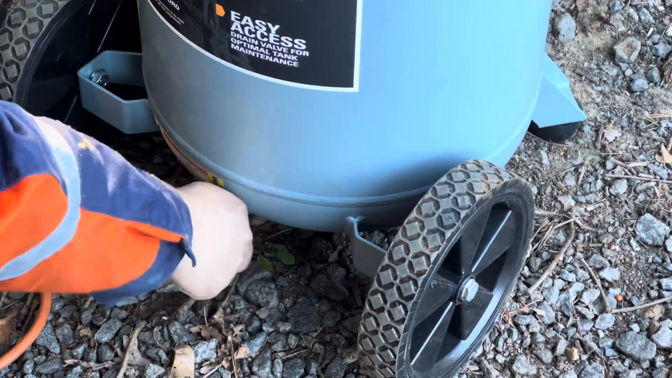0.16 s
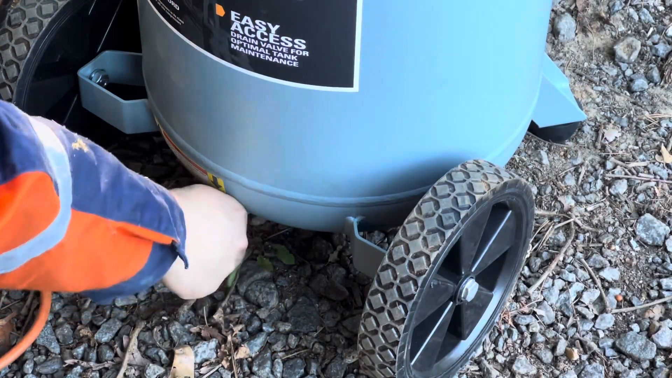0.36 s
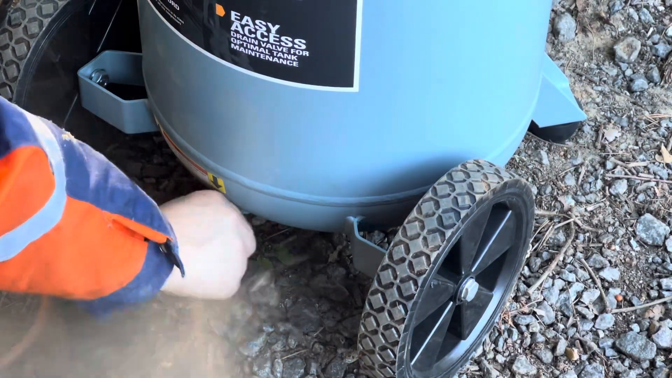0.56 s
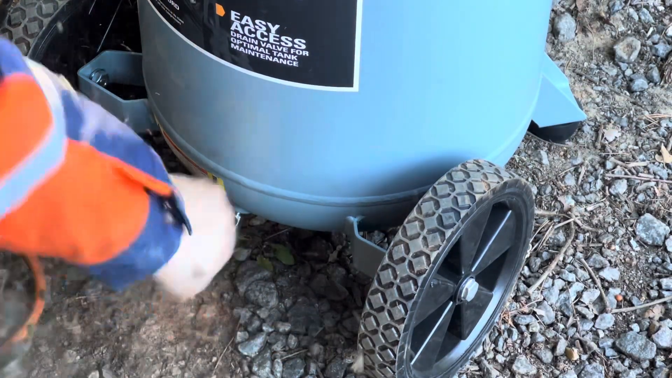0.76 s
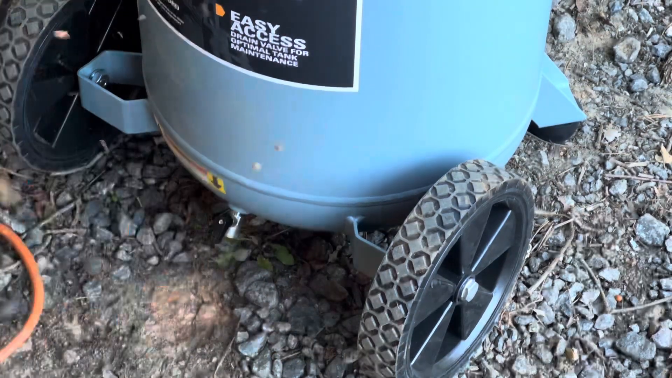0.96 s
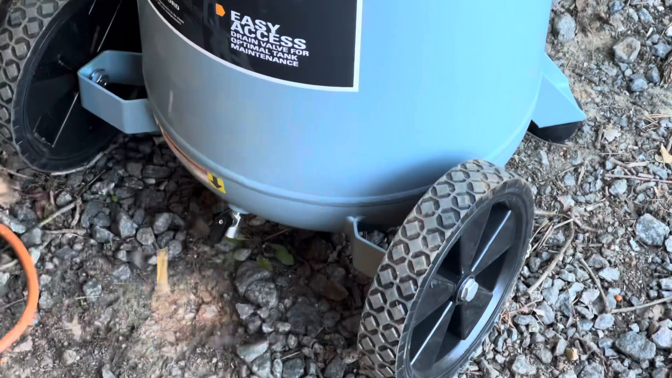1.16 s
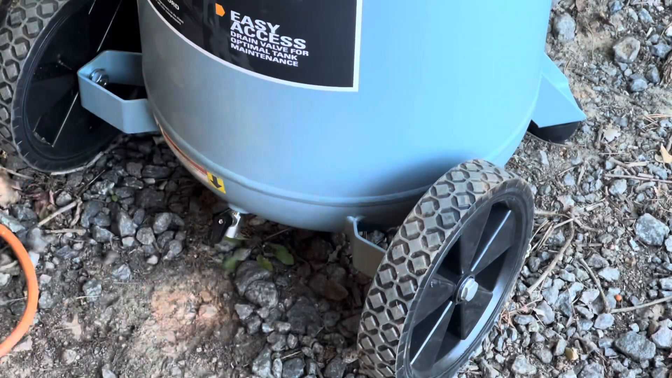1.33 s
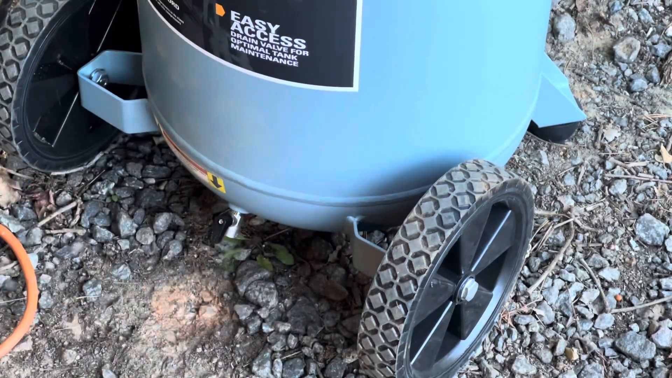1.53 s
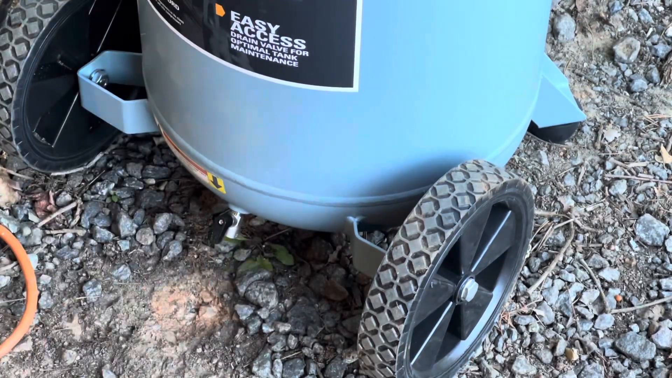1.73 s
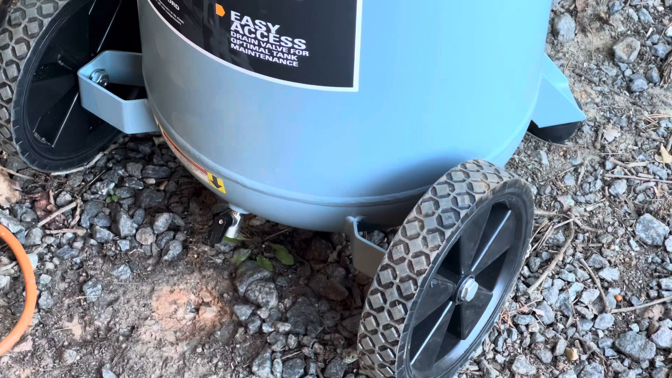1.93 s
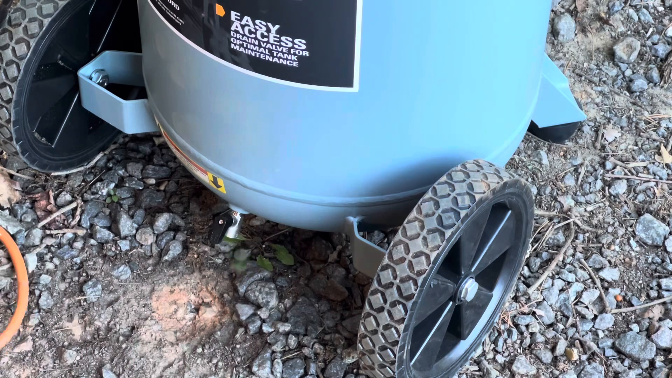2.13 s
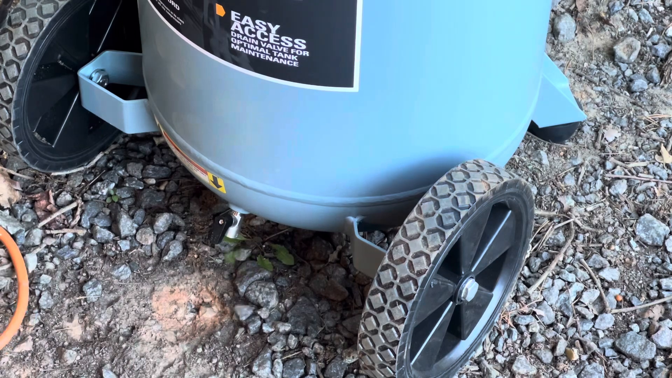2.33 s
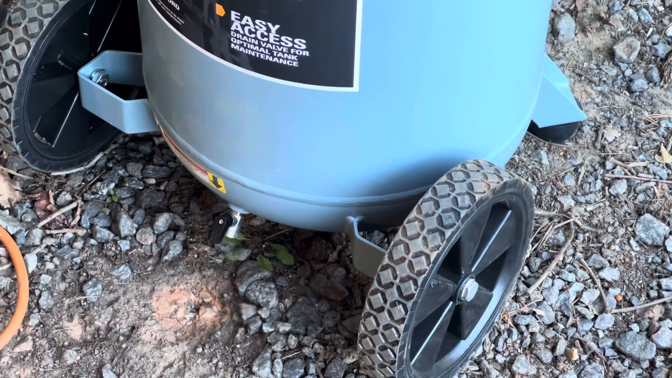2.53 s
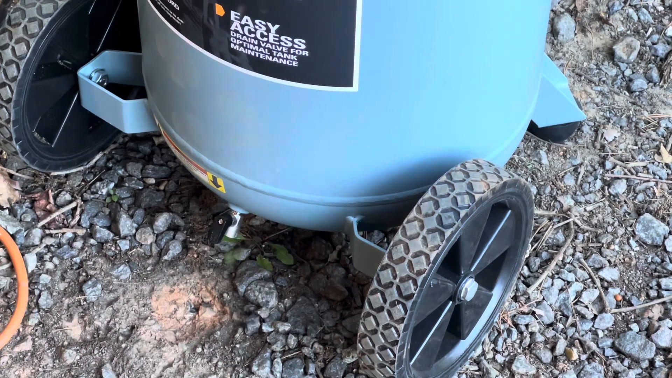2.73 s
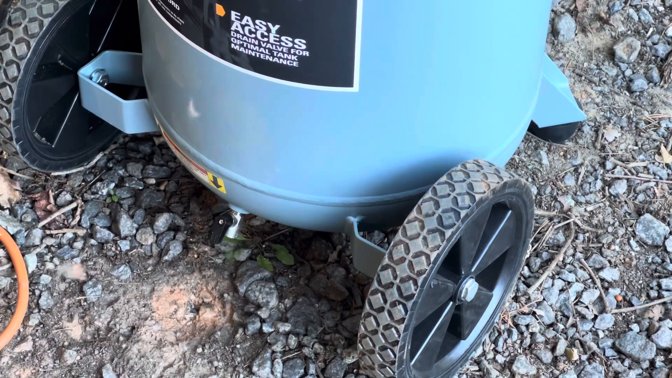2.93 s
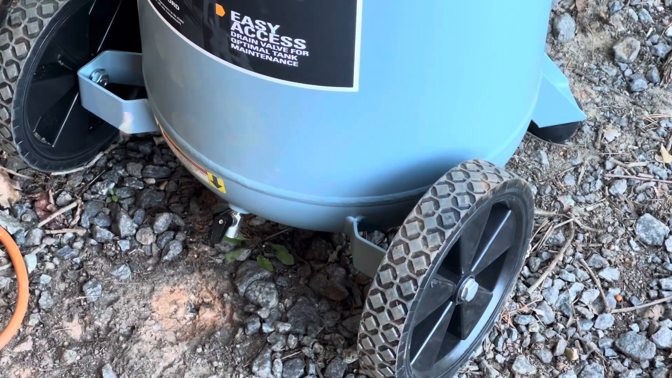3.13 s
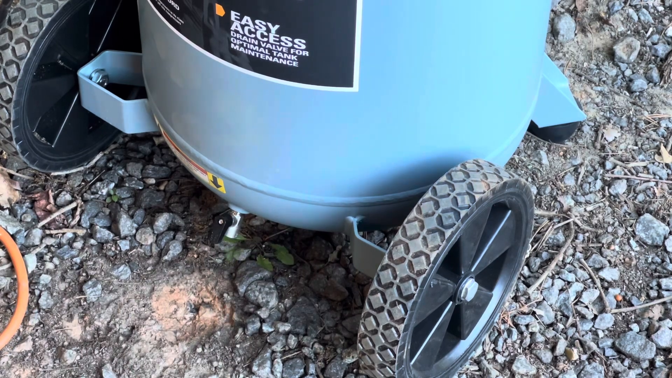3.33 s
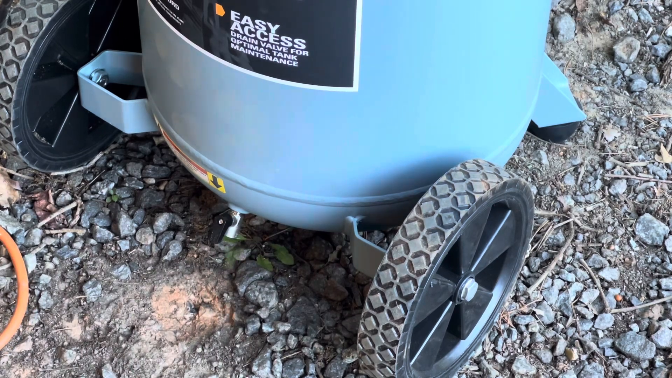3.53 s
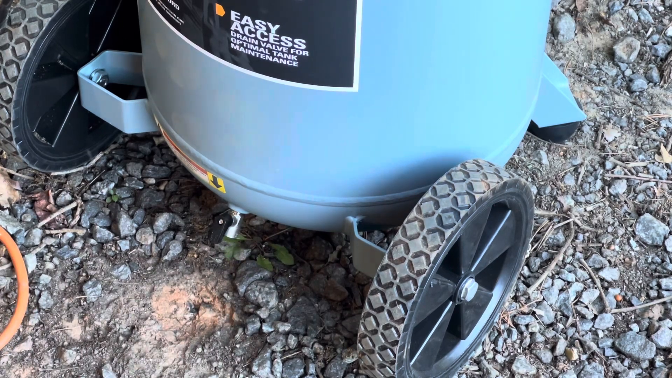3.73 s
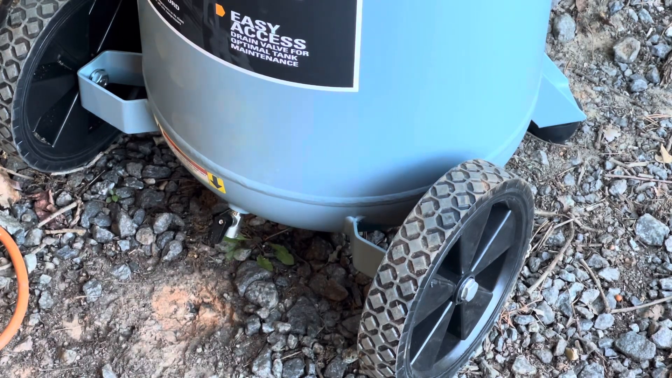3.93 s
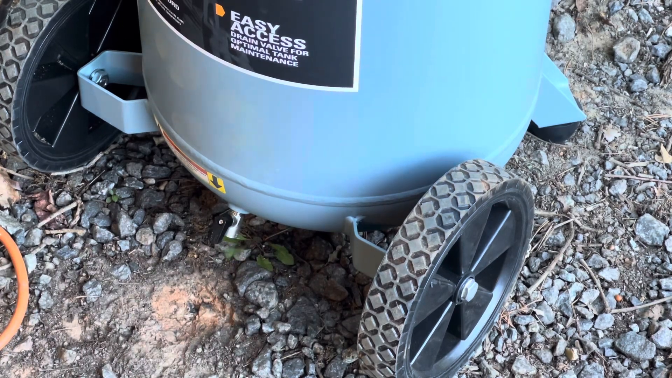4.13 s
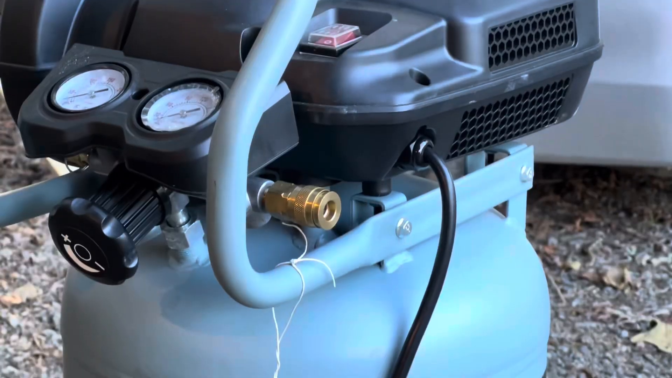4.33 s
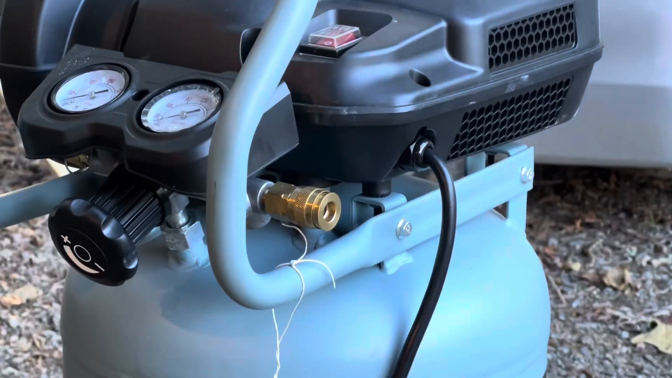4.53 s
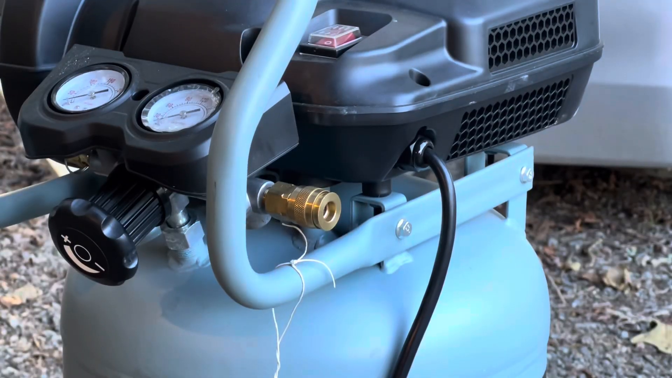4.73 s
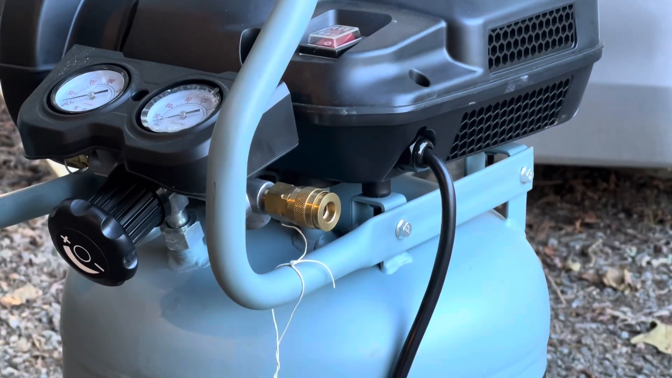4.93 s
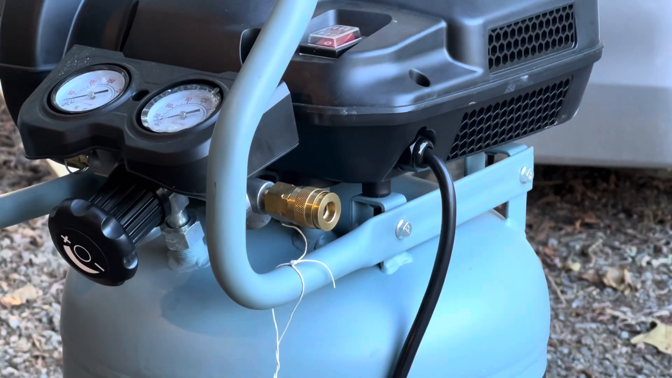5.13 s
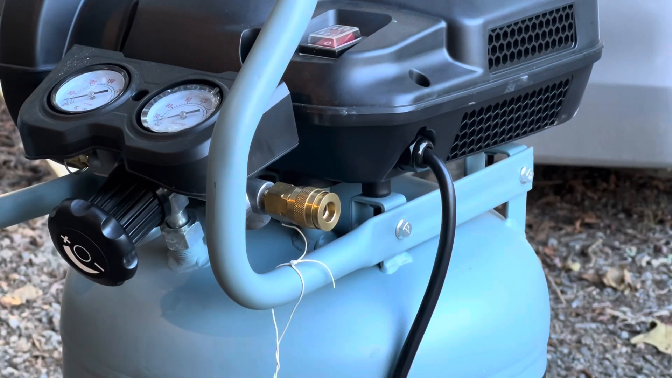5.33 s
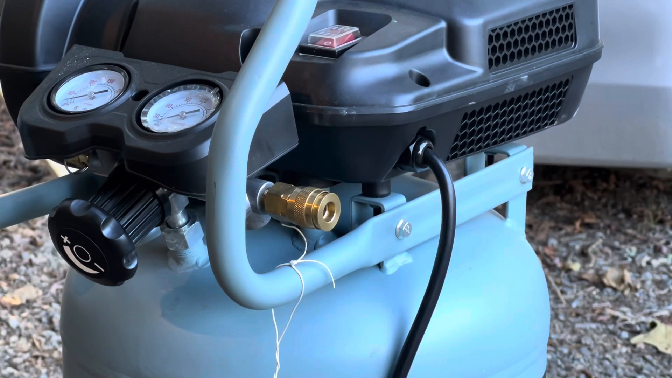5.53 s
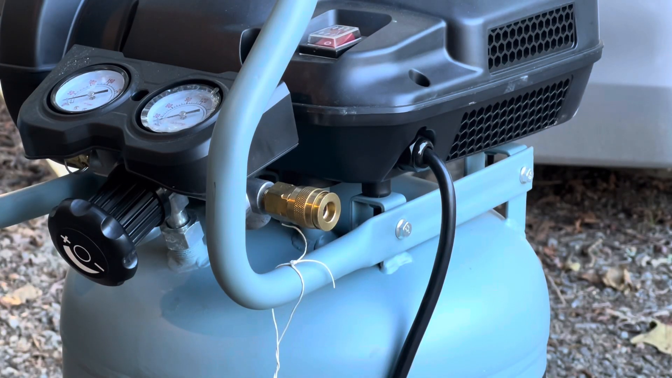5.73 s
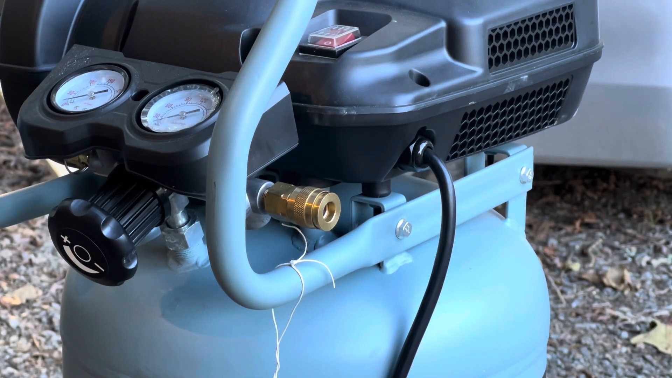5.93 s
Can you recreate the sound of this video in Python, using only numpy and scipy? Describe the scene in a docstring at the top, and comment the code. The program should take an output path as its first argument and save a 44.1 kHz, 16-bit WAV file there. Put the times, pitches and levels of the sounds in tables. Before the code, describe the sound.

A close stereo microphone catches compressed air escaping a drain valve. First comes a narrow, piercing whistle-like hiss, then an abrupt full blast that thumps the microphone with rumbling wind for half a second. The jet keeps roaring, gradually losing body until only smooth, sharp hiss is left. It cuts away just after four seconds to hushed outdoor air: dark distant traffic, wavering low hum, light rustles, a dull knock and delicate ticks.

```python
"""Air tank drain valve, outdoors on gravel

Close at the microphone, a drain valve is cracked open: hiss rings in narrow resonances of its seat.
Fully opened, it gives a noise jet whose roar thins to a hiss with falling pressure, and a low blast of dusty air.
The hiss fades out quickly to a quiet yard: far traffic as dark noise, a close rustle as bright noise,
a low hum of wandering tones, a dull knock of short ringing modes, and ticks of band-passed clicks."""
import sys
import numpy as np
from scipy import signal
from scipy.fft import rfft, irfft, next_fast_len
from scipy.io import wavfile

SR = 44100
rng = np.random.default_rng(int(sys.argv[2]) if len(sys.argv) > 2 else 0)


def transcribe(signal):
    """Save signal, clipped to [-1, 1], as a 16-bit WAV file at the path in sys.argv[1]."""
    frames = np.atleast_2d(signal).T
    limited = np.clip(frames, -1, 1)
    pcm = np.round(limited * 32767).astype(np.int16)
    wavfile.write(sys.argv[1], SR, pcm)


N = 268128

# Source levels are set ahead of the gain control; noise spectra give relative density.
# Jet spectrum at low pressure: (f/Hz, density/dB per Hz)
JET_COLOUR = [(30, -39.5), (70, -25), (250, -27.5), (600, -24.5), (1200, -17), (2500, -9.5), (3000, -7),
              (4200, -5), (6500, -1.5), (8500, -1.5), (10000, -0.5), (11200, 2.4), (12900, -1), (13400, -1),
              (16000, -3)]
# Large eddies grow with pressure: (f/Hz, gain at pressure 1/dB)
PRESSURE_GAIN = [(40, 19), (125, 21.5), (500, 23), (1000, 19.5), (2000, 15), (4000, 7.5), (12000, 3)]
# Flow through the open valve: (t/s, relative pressure)
PRESSURE = [(.47, .55), (.525, 1.19), (1.0, 1.34), (1.12, 1.08), (1.8, 0.83), (2.0, 0.57), (3.0, .16),
            (3.4, 0.021)]
# Air and dust thrown at the microphone: (t/s, level/dB)
BLAST_LEVEL = [(.5, -51.5), (.526, -23), (.536, -6.5), (.585, -10), (.6, -13), (.8, -12), (.96, -15),
               (.995, -28), (1.12, -56.5)]
# Spectrum of that blast: (f/Hz, density/dB per Hz)
BLAST_COLOUR = [(15, -43.5), (30, -18.5), (55, -1), (200, 0.5), (400, -0.5), (700, -3), (1000, -9),
                (1300, -21.5), (2500, -20.5), (3500, -49.5)]
# Leak spectrum without the seat resonances: (f/Hz, density/dB per Hz)
LEAK_COLOUR = [(30, -18.5), (80, -11.5), (250, -20), (700, -14.5), (1500, -15), (2200, -12.5), (3300, -7),
               (4200, -15.5), (5500, -6), (6100, -8.5), (8700, -9.5), (10000, -5.5), (11500, -5.5),
               (13000, -14.5), (14000, -14.5), (14600, -1.5), (15200, -6), (15700, -15.5)]
# Narrow gap at the valve seat: (f/Hz, width before double application/Hz, gain/dB)
SEAT_MODES = [(6720, 96, 14.5), (7030, 170, 17), (7500, 190, 13), (8000, 290, 10.5)]
# Rustle spectrum at closeness 0: (f/Hz, density/dB per Hz)
RUSTLE_COLOUR = [(1500, 8.5), (3000, 5), (5000, -1.5), (6500, -3), (9000, -4.5), (12000, -18), (14000, -21),
                 (16000, -16)]
# A close rustle is brighter: (f/Hz, gain at closeness 1/dB)
CLOSE_GAIN = [(6000, -2.5), (12000, 14.5), (16000, 14.5)]
# Close stirs within the rustle: (t/s, rise/s, hold/s, fall/s, level added/dB, closeness added)
STIRS = [(4.98, .1, 0.12, .05, 4.5, 0.8), (5.3, .08, 0.16, .06, 1.5, .1),
         (5.685, 0.014, 0.018, .03, 7, .85), (5.73, .01, .05, .08, 1.5, .4),
         (5.98, 0.031, .01, .06, 4.5, .75)]
# Ringing modes of the knock: (f/Hz, relative level/dB, t60/s)
KNOCK_MODES = [(300, -5.5, 0.037), (570, -7, .04), (830, -3, 0.057), (1140, 1, 0.031), (1400, -3.5, 0.027),
               (1800, -3.5, .025)]
# Small ticks: (t/s, peak level/dB, centre f/Hz, nominal width/Hz)
TICKS = [(4.703, -44, 6300, 2980), (4.767, -49, 10500, 4000), (4.778, -48, 4200, 1800),
         (4.881, -51, 8550, 3000), (5.1165, -41, 4300, 1500), (5.168, -33, 1400, 900),
         (5.2288, -35, 6350, 700), (5.333, -37.5, 10800, 7000), (5.39, -44, 9500, 5000),
         (5.63, -49, 9000, 2500), (5.706, -44, 11500, 900), (5.711, -43, 4800, 1200),
         (5.716, -43, 7000, 900), (5.7205, -33, 13000, 6000), (5.794, -43, 13000, 7000),
         (5.836, -37.5, 6500, 9100), (6.017, -44, 9000, 2000), (6.044, -45, 10000, 6000)]
# Far traffic spectrum: (f/Hz, density/dB per Hz)
TRAFFIC_COLOUR = [(15, -39.5), (35, -21), (60, -11), (110, -12), (170, -14), (400, -19), (600, -19.5),
                  (850, -17), (1400, -22), (2000, -28), (3000, -38.5), (4500, -52.5), (8000, -66),
                  (12000, -100)]
# Hum tones, low to high: (f/Hz, wander spread/Hz, flutter spread/dB)
HUM_TONES = [(58, 5.0, 2.5), (90, 1.2, 1.5), (143, .7, 1.1)]
# Middle hum tone before flutter: (t/s, level/dB)
HUM_MIDDLE = [(4.2, -47.5), (4.5, -40), (4.85, -59), (4.9, -38), (5.3, -45.5), (6.08, -39.5)]
# Side against mid for close sources: (f/Hz, level/dB)
NEAR_SIDE = [(60, -16.5), (600, -16), (1400, -14.5), (1800, -55.5), (2600, -54.5), (3200, -18), (4200, -60),
             (8600, -67), (9200, -37.5), (16000, -34.5)]
# Side against mid for the wide yard: (f/Hz, level/dB)
YARD_SIDE = [(100, -29), (400, -9), (900, -4), (1500, -6), (2300, -20.5), (3200, -8), (4500, -22),
             (16000, -22)]
# Two microphone ports: (f/Hz, lead of right over left/turns)
PORT_LEAD = [(100, -.03), (600, -.035), (950, 0), (1300, .035), (1650, .02), (1800, 0), (2650, 0),
             (2850, -.035), (3600, -.035), (4100, 0), (8800, 0), (9130, .26), (9850, .5), (10380, .5),
             (11750, 1), (12330, 1), (13350, 1.5), (14180, 1.5), (15230, 2)]

OPEN_S, OPEN_RISE_S = .468, 0.0066   # the valve is thrown open
JET_DB, JET_DB_PER_PRESSURE = -18.5, -2.5   # the fine hiss gains a little as the roar leaves
DUST_DB, DUST_END_S, DUST_FALL_S = 5.5, 1.05, .09   # louder while loose dust is being blown off
SPURT_DB, SPURT_RISE_S, SPURT_END_S, SPURT_FALL_S = 4.5, .045, .533, .012   # the first rush overshoots
FADE_S, FADE_LENGTH_S, FADE_POWER = 4.174, .043, 3   # the hiss fades out
LEAK_DB, LEAK_SAG_DB_PER_S = -16.5, 9   # valve barely open: level at first, slow loss
NUDGE_S, NUDGE_RISE_S, NUDGE_DB = .35, .015, 3.5   # the handle slips a little further
LEAK_GONE_S = .03   # time for the whistle to drown once the valve opens
YARD_S, YARD_RISE_S = 4.199, .03   # the yard fades in
RUSTLE_FAINT_DB, RUSTLE_FAINT_DB_PER_S = -88.0, 31   # a rustle creeps in
RUSTLE_S, RUSTLE_RISE_S, RUSTLE_DB = 4.88, 0.012, -56   # then sets in steadily
RUSTLE_CLOSENESS = .12   # between stirs
KNOCK_S, KNOCK_DB = 5.1155, -21.5   # onset, peak level
TICK_T60_S, TICK_RING_CYCLES = 0.011, 7.0   # narrow bands ring longer: t60 plus cycles / width
TRAFFIC_DB, TRAFFIC_DB_PER_S = -44.5, 2.5   # draws slowly nearer
HUM_LOW_DB, HUM_HIGH_DB, HUM_HIGH_SAG_DB_PER_S = -45, -44.5, 2.5
LIMIT_DB, LIMIT_SHARE = -18.5, 0.42   # threshold, dB of cut per dB above it
LIMIT_ATTACK_S, LIMIT_RELEASE_DB_PER_S = 0.0084, 61   # level smoothing, fall of the held level
PEAK_ROUNDING, CUTOFF_HZ, CUTOFF_WIDTH_HZ = 1.5, 15820, 120   # amplitude ceiling, top of the band


def jet():
    """Turbulent air makes a smooth bright hiss; higher pressure adds low roar from larger eddies."""
    pressure = np.interp(seconds(), *np.transpose(PRESSURE))
    level_db = JET_DB + JET_DB_PER_PRESSURE * pressure
    level_db += DUST_DB * (1 - ramp(DUST_END_S, DUST_FALL_S))
    level_db += SPURT_DB * (ramp(OPEN_S, SPURT_RISE_S) - ramp(SPURT_END_S, SPURT_FALL_S))
    fade = (1 - ramp(FADE_S, FADE_LENGTH_S)) ** FADE_POWER
    opening = ramp(OPEN_S, OPEN_RISE_S) * fade
    spectra = stereo_noise(colour_gain(JET_COLOUR), NEAR_SIDE)
    return from_db(level_db) * opening * turbulence(spectra, 0.74, 0.71, 12.0, pressure)


def blast():
    """Air and dust thrown at the microphone buffet it with low, lumpy noise."""
    level_db = np.interp(seconds(), *np.transpose(BLAST_LEVEL), left=-120, right=-120)
    spectra = stereo_noise(colour_gain(BLAST_COLOUR), NEAR_SIDE)
    return from_db(level_db) * turbulence(spectra, 1.6, 0.95, 45.0)


def leak():
    """Thin hiss whose energy gathers in the resonances of the valve seat, heard as a whistle."""
    seat = sum(from_db(db) * resonance(hz, width_hz) for hz, width_hz, db in SEAT_MODES)
    spectra = stereo_noise(colour_gain(LEAK_COLOUR) * (1 + seat), NEAR_SIDE)
    level_db = LEAK_DB - LEAK_SAG_DB_PER_S * seconds() + NUDGE_DB * ramp(NUDGE_S, NUDGE_RISE_S)
    audible = 1 - ramp(OPEN_S, LEAK_GONE_S)
    return from_db(level_db) * audible * turbulence(spectra, 1.3, 0.28, 14.0)


def rustle():
    """Fine noise close by; each stir makes it louder and, by coming closer, brighter."""
    faint_db = RUSTLE_FAINT_DB + RUSTLE_FAINT_DB_PER_S * since_yard()
    level_db = faint_db + (RUSTLE_DB - faint_db) * ramp(RUSTLE_S, RUSTLE_RISE_S)
    closeness = RUSTLE_CLOSENESS
    for start_s, rise_s, hold_s, fall_s, louder_db, closer in STIRS:
        stir = ramp(start_s, rise_s) - ramp(start_s + rise_s + hold_s, fall_s)
        level_db = level_db + louder_db * stir
        closeness = closeness + closer * stir
    spectra = stereo_noise(colour_gain(RUSTLE_COLOUR), NEAR_SIDE)
    return from_db(level_db) * turbulence(spectra, 0.56, 1.2, 20.0, closeness, CLOSE_GAIN)


def knock():
    """A soft blow, a millisecond long, sets a few short modes ringing."""
    out, t = np.zeros(N), np.arange(SR // 10) / SR
    rings = sum(from_db(db - 60 * t / t60) * np.sin(2 * np.pi * hz * t) for hz, db, t60 in KNOCK_MODES)
    rings = rings * (1 - np.exp(-t / .001))
    at = round(KNOCK_S * SR)
    out[at:at + len(t)] = from_db(KNOCK_DB) * rings / np.abs(rings).max()
    return out


def ticks():
    """Each tick is a sharp click with a short trail of noise, heard through one band."""
    out, t = np.zeros(N), np.arange(SR // 10) / SR
    for start_s, peak_db, hz, width_hz in TICKS:
        edges = np.clip([hz - width_hz / 2, hz + width_hz / 2], 100, SR / 2 - 2000)
        t60 = TICK_T60_S + TICK_RING_CYCLES / width_hz
        trail = rng.standard_normal(len(t)) * from_db(-60 * t / t60)
        contact = 4.5 * (t == 0) + trail
        band = signal.butter(2, edges, "band", fs=SR, output="sos")
        burst = signal.sosfilt(band, contact)
        at = round(start_s * SR)
        out[at:at + len(t)] += (from_db(peak_db) * burst / np.abs(burst).max())[:N - at]
    return out


def traffic():
    """Far traffic is dark, wide noise that slowly gains level as it draws nearer."""
    spectra = stereo_noise(colour_gain(TRAFFIC_COLOUR), YARD_SIDE)
    level_db = TRAFFIC_DB + TRAFFIC_DB_PER_S * since_yard()
    return from_db(level_db) * turbulence(spectra, 0.63, 0.6, 18.0)


def hum():
    """Low tones that wander a little in pitch and flutter in level."""
    out, t = 0, seconds()
    middle_db = np.interp(t, *np.transpose(HUM_MIDDLE))
    high_db = HUM_HIGH_DB - HUM_HIGH_SAG_DB_PER_S * (t - YARD_S)
    for level_db, (hz, wander_hz, flutter_db) in zip((HUM_LOW_DB, middle_db, high_db), HUM_TONES):
        phase = 2 * np.pi * np.cumsum(hz + wander_hz * drift(6.2)) / SR
        tone = np.sqrt(2) * np.sin(phase)   # unit rms
        out = out + from_db(level_db + flutter_db * drift(11.0)) * tone
    return out


def turbulence(spectra, shared_db, own_db, rate_hz, control=0, gain_table=PRESSURE_GAIN):
    """Cross-fading octave bands flicker partly together and partly alone; a control tilts them."""
    out, together, octave = 0, drift(rate_hz), np.log2(bins_hz() + 1e-9)
    for centre in np.arange(5, 15):   # 32 Hz to 16 kHz
        share = np.cos(np.pi / 2 * np.clip(octave - centre, -1, 1)) ** 2
        flicker_db = shared_db * together + own_db * drift(rate_hz)
        tilt_db = control * at_hz(gain_table, 2 ** centre)
        out = out + from_db(flicker_db + tilt_db) * irfft(spectra * share, N)
    return out


def stereo_noise(gain, side_db):
    """Spectra of left and right noise, mid plus and minus side; the mid has unit rms."""
    mid, side = rfft(rng.standard_normal((2, N))) * gain
    side = side * from_db(at_hz(side_db, bins_hz()))
    return np.array([mid + side, mid - side]) / np.sqrt(np.mean(gain ** 2))


def resonance(hz, width_hz):
    """Gain per bin of a doubly applied resonance, 1 on top."""
    return 1 / (1 + (2 * (bins_hz() - hz) / width_hz) ** 2)


def drift(rate_hz):
    """Slow chance of about unit spread: noise through two equal low-pass poles."""
    step = 40   # samples between drawn values
    r = np.exp(-2 * np.pi * rate_hz * step / SR)
    draws = rng.standard_normal(N // step + 2002)
    slow = signal.lfilter([1], [1, -2 * r, r * r], draws)[2000:]   # skip the filter's start
    return np.interp(np.arange(N) / step, np.arange(len(slow)), rms_one(slow))


def colour_gain(colour):
    """Noise gain per bin from a spectrum table."""
    return from_db(at_hz(colour, bins_hz()))


def at_hz(points, hz):
    """Table value on a log-frequency axis."""
    table_hz, values = np.transpose(points)
    return np.interp(np.log(hz + 1e-9), np.log(table_hz), values)


def bins_hz():
    """Frequency of each FFT bin."""
    return np.arange(N // 2 + 1) * SR / N


def seconds():
    """Time of each sample."""
    return np.arange(N) / SR


def since_yard():
    """Seconds since the yard began to fade in, 0 before."""
    return np.maximum(seconds() - YARD_S, 0)


def ramp(start_s, length_s):
    """0 before the start, rising straight to 1."""
    return np.clip((seconds() - start_s) / length_s, 0, 1)


def from_db(db):
    """Decibels to gain."""
    return 10 ** (np.asarray(db) / 20)


def rms_one(x):
    """Scale to unit rms."""
    return x / np.sqrt(np.mean(x ** 2) + 1e-20)


def scene():
    """All sources at the microphone."""
    valve = jet() + blast() + leak()
    yard = ramp(YARD_S, YARD_RISE_S) * (rustle() + traffic() + hum())
    return valve + knock() + ticks() + yard


def gain_control(x):
    """Loud passages are turned down quickly and let up slowly, both channels alike."""
    r = np.exp(-1 / (LIMIT_ATTACK_S * SR))
    power = signal.lfilter([1 - r], [1, -r], np.mean(x ** 2, axis=0))
    level_db = 10 * np.log10(power + 1e-12)
    # A running maximum against a slope holds each peak and lets it fall at the release rate.
    slope = LIMIT_RELEASE_DB_PER_S * seconds()
    held_db = np.maximum.accumulate(level_db + slope) - slope
    return x * from_db(-LIMIT_SHARE * np.maximum(held_db - LIMIT_DB, 0))


def record(dry):
    """Gain control and peak rounding, then port phase between the channels and a cut of the top."""
    size = next_fast_len(N + 2048)
    hz = np.arange(size // 2 + 1) * SR / size
    lead_turns = np.interp(hz, *np.transpose(PORT_LEAD))
    ports = np.exp(1j * np.pi * lead_turns * [[-1], [1]])   # half the lead on each channel
    low_pass = np.sin(np.pi / 2 * np.clip((CUTOFF_HZ - hz) / CUTOFF_WIDTH_HZ, 0, 1)) ** 2
    rounded = PEAK_ROUNDING * np.tanh(gain_control(dry) / PEAK_ROUNDING)
    return irfft(rfft(rounded, size) * ports * low_pass, size)[:, :N]


dry = scene()
out = record(dry)
transcribe(out)
```